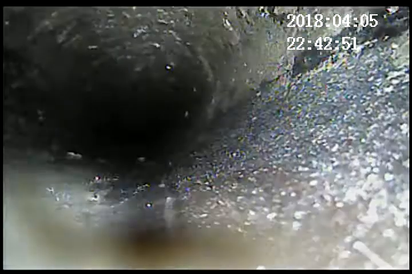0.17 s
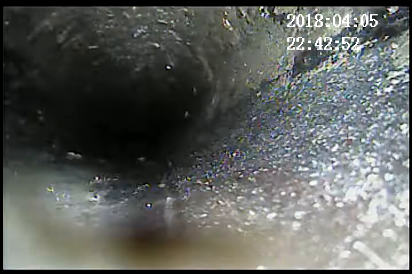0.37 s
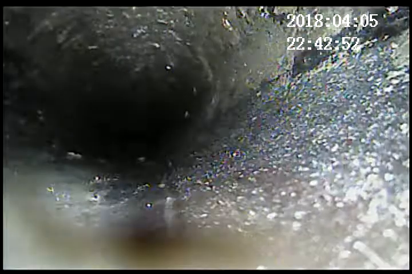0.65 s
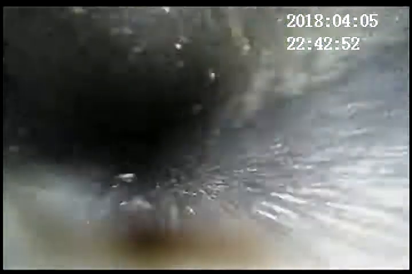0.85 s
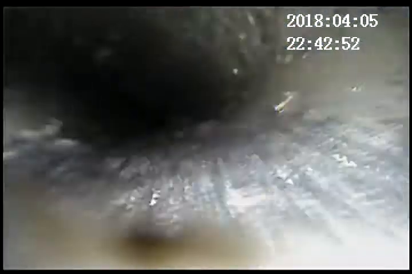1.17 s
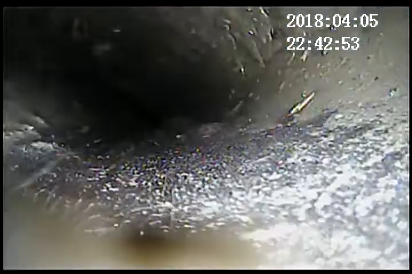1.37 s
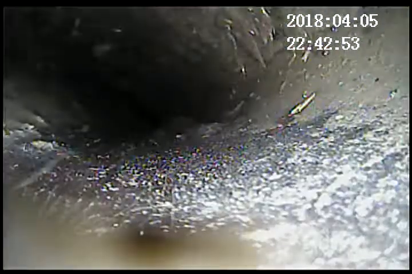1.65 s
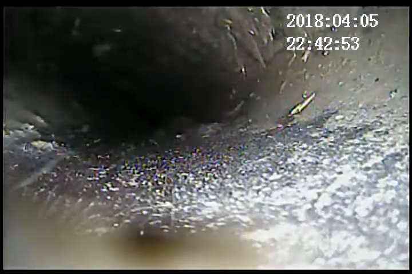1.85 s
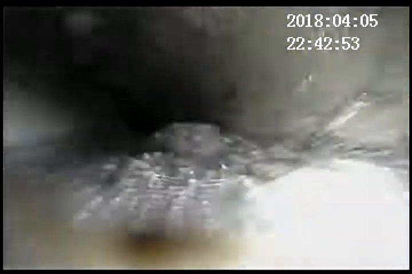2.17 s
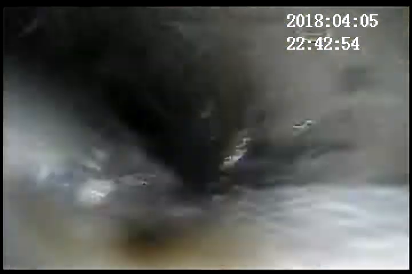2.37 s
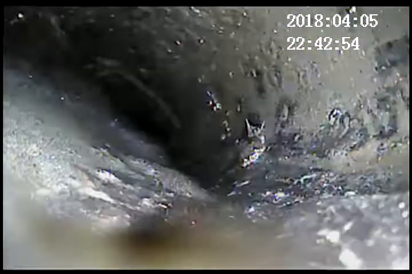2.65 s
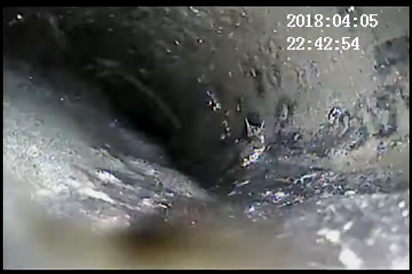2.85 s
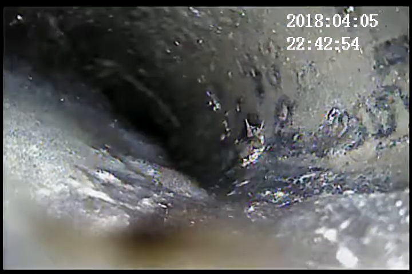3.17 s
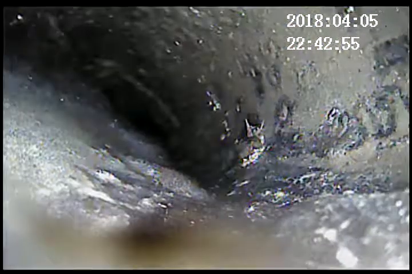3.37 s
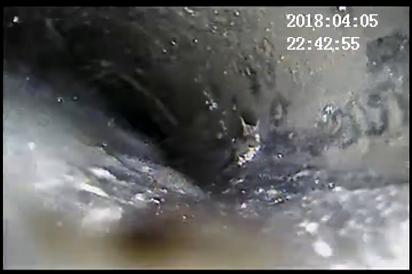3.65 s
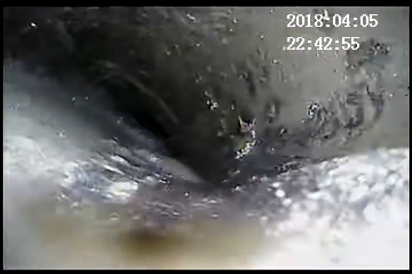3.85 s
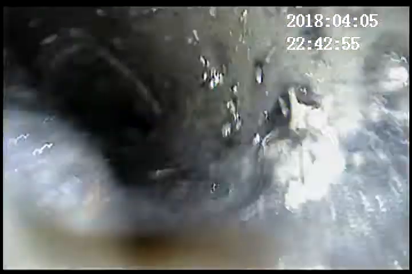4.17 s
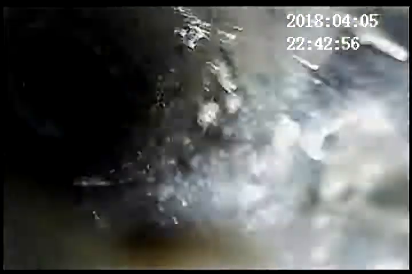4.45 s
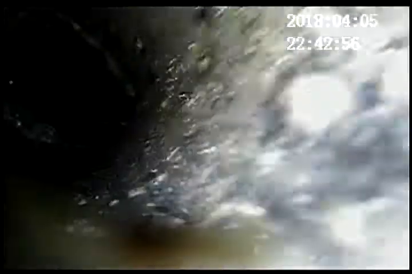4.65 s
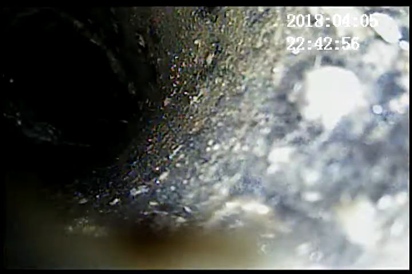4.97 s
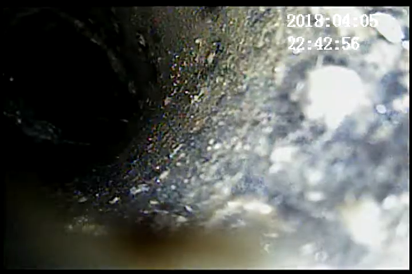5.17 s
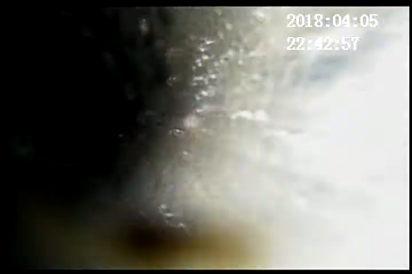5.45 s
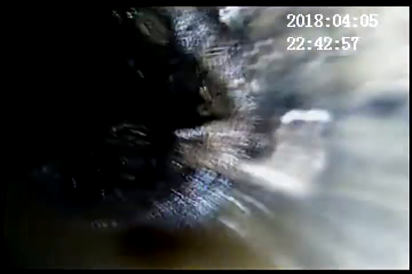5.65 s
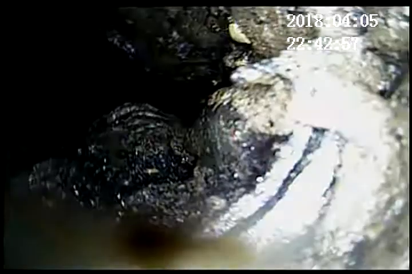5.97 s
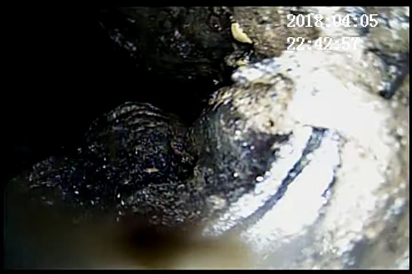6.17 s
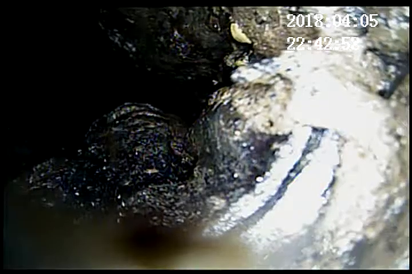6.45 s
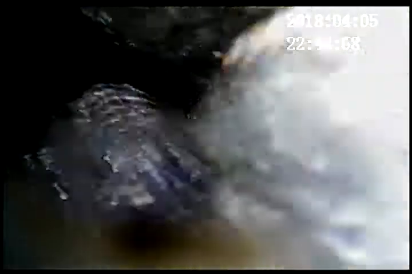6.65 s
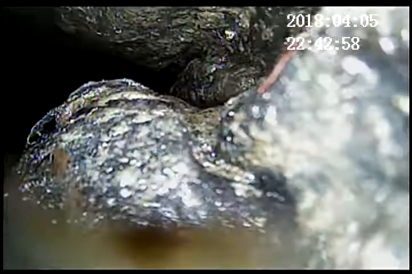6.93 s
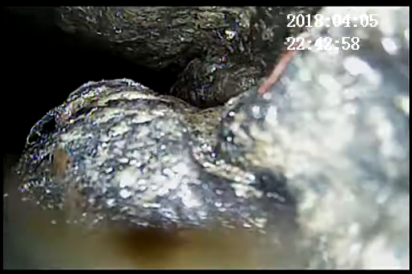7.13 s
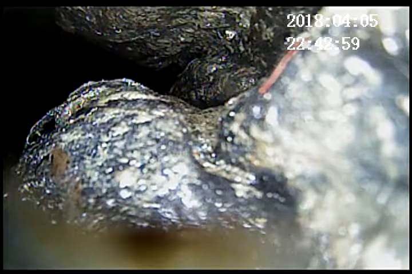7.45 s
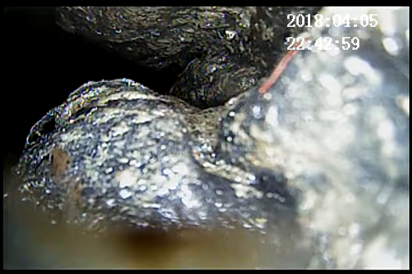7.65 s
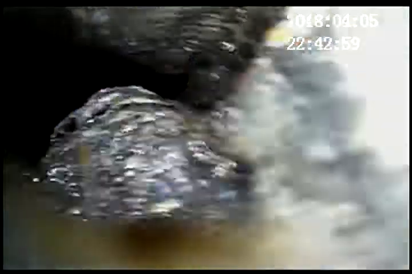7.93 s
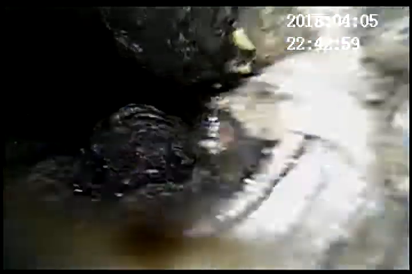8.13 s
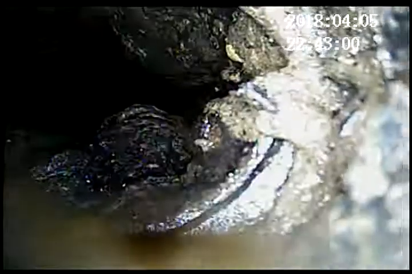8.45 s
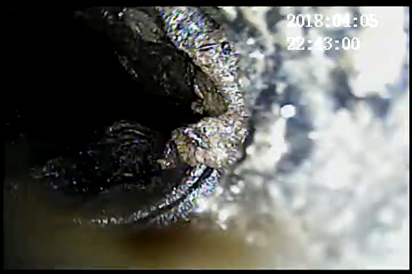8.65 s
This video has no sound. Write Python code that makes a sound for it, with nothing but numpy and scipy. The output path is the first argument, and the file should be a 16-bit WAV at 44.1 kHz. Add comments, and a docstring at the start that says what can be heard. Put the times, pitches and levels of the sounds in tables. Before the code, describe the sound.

A stiff cable is pushed in uneven bursts through a metal frame. Stick-slip creaks come first, then soft thuds and the loudest ringing knocks, overloading slightly. Afterwards come irregular clacks, brief rasping snags and faint steel pings, becoming sparse, with a soft double bump near the end. Close, dry single microphone, dull in the extreme top, with constant low hiss.

```python
"""Push cable at its reel

An inspection camera is worked along a damaged pipe on a stiff push cable, heard at the cable reel.
Sliding cable: fine slips drive the frame modes as hiss and scrape. Reel: stick-slip drives the low modes.
Cable knocks ring the frame, some with a steel chime; brief squeaks are single wavering tones.
Handling adds swung bumps and lumpy rumble over steady hiss; the hardest blows clip.
"""
import sys
import numpy as np
from scipy import signal
from scipy.fft import rfft, irfft, next_fast_len
from scipy.io import wavfile
from scipy.ndimage import uniform_filter1d

SR = 44100
rng = np.random.default_rng(int(sys.argv[2]) if len(sys.argv) > 2 else 0)


def dump(signal):
    """Clip the signal to [-1, 1] and save it as 16-bit WAV at the path in sys.argv[1]."""
    limited = np.clip(np.atleast_2d(signal).T, -1, 1)
    pcm = np.round(limited * 32767).astype(np.int16)
    wavfile.write(sys.argv[1], SR, pcm)


N = 387888
TIME = np.arange(N) / SR


def from_db(db):
    return 10 ** (np.asarray(db) / 20)


def clock(seconds):
    return np.arange(int(seconds * SR)) / SR


def rms_one(x):
    return x / np.sqrt(np.mean(x ** 2) + 1e-20)


def envelope(x, seconds):
    """Running rms."""
    return np.sqrt(np.abs(uniform_filter1d(x ** 2, max(int(seconds * SR), 1), mode="constant")) + 1e-16)


def peak_one(x):
    """Scale the highest 4 ms rms to 1."""
    return x / envelope(x, 0.004).max()


def add(out, s, sound):
    at = max(int(s * SR), 0)
    out[at:at + len(sound)] += sound[:N - at]


def band(x, low_hz, high_hz):
    sos = signal.butter(2, [low_hz, min(high_hz, SR / 2 - 100)], "band", fs=SR, output="sos")
    return signal.sosfilt(sos, x)


def steep_band(x, low_hz, high_hz):
    return band(band(x, low_hz, high_hz), low_hz, high_hz)


def band_noise(t, low_hz, high_hz, t60):
    """Dying noise in one band."""
    return band(rng.standard_normal(len(t)) * fade(t, t60), low_hz, high_hz)


def fade(t, t60):
    return np.exp(-np.log(1000) * t / t60)


def coloured(x, points):
    """Give x a smooth spectrum; rms 1."""
    hz, db = np.transpose(points)
    size = next_fast_len(N)
    bins = np.maximum(np.fft.rfftfreq(size, 1 / SR), 1)
    gain = from_db(np.interp(np.log(bins), np.log(hz), db))
    return rms_one(irfft(rfft(x, size) * gain, size)[:N])


def slips(per_s, spread_db):
    """Friction: tiny slips at random moments, of uneven size."""
    happens = rng.random(N) < per_s / SR
    sign = rng.choice([-1, 1], N)
    return happens * sign * from_db(spread_db * np.clip(rng.standard_normal(N), -2, 2))


def grip(spread_db, per_s=45):
    """Contact pressure wavers at random: a gain over time."""
    steps = rng.standard_normal(4000)
    return from_db(spread_db * np.interp(TIME * per_s, np.arange(len(steps)), steps))


def strokes(rows, rise_s, sag_db_per_s, release_db_per_s):
    """Gain of strokes (t/s, hold/s, level/dB): swells 20 dB per rise time, sags in the hold, dies away."""
    power = np.zeros(N)
    for (s, hold_s, db), rise in zip(rows, np.broadcast_to(rise_s, len(rows))):
        age = TIME - s
        swell_db = 20 * np.minimum(age, 0) / rise
        sag_db = sag_db_per_s * np.clip(age, 0, hold_s)
        release_db = release_db_per_s * np.maximum(age - hold_s, 0)
        shape_db = swell_db - sag_db - release_db
        heard = shape_db > -60
        power[heard] += from_db(db + shape_db[heard]) ** 2
    return np.sqrt(power)


# reel frame modes: f/Hz, t60/s, struck spectral height/dB, rubbed spectral height/dB (both relative)
FRAME_MODES = [(229.2, 0.18, -21, -4), (299.2, 0.15, -5, 7), (320.6, 0.082, -9, 1), (347, 0.17, -10, 5),
               (454, 0.12, -2.5, -7.5), (504.3, 0.12, -1.5, -9), (543.3, 0.063, -16, -10.5),
               (658.4, 0.075, 6, -9), (714, 0.16, 3, -13), (806, 0.14, 4.5, -13.5),
               (902, 0.064, 3.5, -10.5), (1091, 0.046, 0.5, -9.5), (1135, 0.044, -12, -32),
               (1422, 0.086, 1.5, -20), (1491, 0.022, -2.5, -23), (1991, 0.017, -8.5, -21.5),
               (2308, 0.044, 1.5, -8.5), (2495, 0.028, -0.5, -17.5), (2598, 0.098, -2, -8.5),
               (2857, 0.056, -7, -14), (3220, 0.018, -10.5, -38), (3413, 0.26, -4.5, -53),
               (3720, 0.022, -3, -33), (3814, 0.026, -4, -31), (3900, 0.045, -10, -48),
               (4160, 0.069, -4.5, -40), (4230, 0.031, -14, -36)]
# upper edges of body, clack and ping registers: f/Hz
REGISTER_EDGES_HZ = [600, 1700, 3400]


def registers():
    """Masks of the modes in the frame's body, clack, ping and top."""
    which = np.digitize(np.array(FRAME_MODES)[:, 0], REGISTER_EDGES_HZ)
    return [which == k for k in range(4)]


def rubbed(force, register):
    """Friction drives one register's modes as two-pole resonators; rms 1."""
    out = np.zeros(N)
    for k, (hz, t60, _, db) in enumerate(np.array(FRAME_MODES)[register]):
        r = from_db(-60 / (t60 * SR))
        poles = [1, -2 * r * np.cos(2 * np.pi * hz / SR), r * r]
        zeros = [(1 - r * r) / 2, 0, (r * r - 1) / 2]   # about unit gain at resonance
        out += (-1) ** k * from_db(db) * signal.lfilter(zeros, poles, force + 1e-18)
    return rms_one(out)


# snags and drags: t/s, relative rasp level/dB, relative scrape level/dB, decay/s
CABLE_DRAGS = [(0.248, -23.5, -44, 0.012), (0.321, -19, -46, 0.0023), (0.976, -35, -44, 0.015),
               (1.165, -33.5, -36.5, 0.033), (1.96, -24.5, -49, 0.0035), (2.06, -28, -47, 0.0072),
               (2.11, -38, -35, 0.013), (3.228, -13.5, -10, 0.015), (3.262, -18, -12.5, 0.011),
               (4.3, -33, -39, 0.035), (4.446, -56, -39, 0.018), (5.031, -26.5, -26, 0.0081),
               (5.343, -37, -33, 0.0042), (6.076, -39, -34, 0.012), (7.853, -26.5, -26.5, 0.0095),
               (7.876, -29.5, -32, 0.073), (7.942, -42, -32, 0.0091), (7.968, -28, -34, 0.0093)]


def drags(rise_s=0.001):
    """Each snag lets go quickly and dies away: gains of (rasp, scrape)."""
    t, out = clock(0.25), np.zeros((2, N))
    for s, rasp_db, scrape_db, decay_s in CABLE_DRAGS:
        shape = (1 - np.exp(-t / rise_s)) * np.exp(-t / decay_s)
        add(out[0], s, from_db(rasp_db) * shape)
        add(out[1], s, from_db(scrape_db) * shape)
    return out


# pushes through the guide: t at full speed/s, hold/s, relative hiss level/dB, relative scrape level/dB
CABLE_PUSHES = [(0.01, 0.16, -46, -40), (0.197, 0.32, -38, -40), (0.786, 0.11, -38, -36),
                (0.956, 0.29, -39.5, -37), (1.47, 0.25, -43.5, -53), (1.997, 0.46, -37, -33),
                (2.586, 0.31, -45, -56), (3.05, 0.057, -44.5, -31.5), (3.55, 0.12, -46.5, -34),
                (4.105, 0.16, -40.5, -35.5), (4.308, 0.19, -38.5, -34), (4.662, 0.25, -42, -33),
                (4.975, 0.064, -39, -30), (5.306, 0.36, -45.5, -38), (5.568, 0.25, -38.5, -36.5),
                (6.03, 0.32, -43, -36.5), (6.4, 0.14, -48, -41), (6.662, 0.21, -41.5, -35),
                (7.097, 0.069, -49, -36), (7.262, .19, -54.5, -45), (7.72, 0.23, -46, -40),
                (7.894, .3, -46.5, -37)]
PUSH_RISE_S, PUSH_RELEASE_DB_PER_S = 0.092, 170


def cable(hiss_db=-4.0, scrape_db=-11.0, drag_db=-1.5, broad_db=-9, grit_db=-22,
          guide_db=-12, hollow_db=-3, even_s=0.037):
    """Sliding cable feeds fine slips to the frame modes, with bursts where it snags."""
    _, clack, ping, top = registers()
    hz = np.array(FRAME_MODES)[:, 0]
    hollow = (hz > 400) & (hz < 600)
    s, hold_s, *levels_db = np.transpose(CABLE_PUSHES)
    sliding = np.array([strokes(np.c_[s, hold_s, db], PUSH_RISE_S, 0, PUSH_RELEASE_DB_PER_S)
                        for db in levels_db])
    sliding = sliding * from_db([[hiss_db], [scrape_db]]) * grip(spread_db=2.97)
    hiss, scrape = sliding + from_db(drag_db) * drags()   # snag rasp joins the hiss

    force = slips(per_s=3000, spread_db=9)
    bright = rubbed(force, ping | top)
    bright = bright + from_db(broad_db) * rms_one(band(force, 1870, 3300))
    bright = bright + from_db(grit_db) * rms_one(band(force, 2700, 11700))
    # the guide has a thin ring of its own
    guide_ring = rms_one(band(slips(per_s=3000, spread_db=5), 3570, 3750))
    bright = bright + from_db(guide_db) * guide_ring
    dull = rubbed(force, clack) + from_db(hollow_db) * rubbed(force, hollow)
    # level each texture before its gain shapes it
    return hiss * bright / envelope(bright, even_s) + scrape * dull / envelope(dull, 2 * even_s)


# reel turns: t at full force/s, hold/s, 20 dB rise/s, relative groan level/dB, relative rasp level/dB
REEL_TURNS = [(0.183, 0.018, 0.029, -22.5, -34), (0.212, 0.017, .014, -6.5, -27.5),
              (0.256, 0.0091, 0.021, -8.5, -20.5), (0.292, 0.0096, 0.015, -5.5, -22),
              (0.424, 0.1, 0.039, -17.5, -27), (0.805, 0.0095, 0.057, -17, -26),
              (0.834, 0.034, 0.033, -15, -39), (0.934, 0.033, .03, -29, -58),
              (1.69, 0.006, 0.011, -23, -37), (1.947, 0.12, .015, -17, -30.5),
              (2.216, 0.085, .012, -19, -43.5), (2.294, 0.082, 0.047, -14.5, -34.5),
              (2.423, 0.012, .018, -11, -32), (2.482, 0.015, 0.012, -4.5, -22),
              (5.028, 0.044, .02, -22.5, -32.5), (5.336, 0.02, 0.024, -32.5, -43)]
GROAN_SAG_DB_PER_S, RASP_SAG_DB_PER_S, TURN_RELEASE_DB_PER_S = 23, 67, 323


def reel(grit_db=-36, shake_db=-15, fill_db=-1, even_s=0.028):
    """Stick-slip at the hub drives the low modes, with a low shake and a little grit."""
    body, clack, _, _ = registers()
    s, hold_s, rise_s, groans_db, rasps_db = np.transpose(REEL_TURNS)
    groan = strokes(np.c_[s, hold_s, groans_db], rise_s, GROAN_SAG_DB_PER_S, TURN_RELEASE_DB_PER_S)
    rasp = strokes(np.c_[s, hold_s, rasps_db], rise_s, RASP_SAG_DB_PER_S, TURN_RELEASE_DB_PER_S)
    force = slips(per_s=1500, spread_db=1.0)
    low = rubbed(force, body)
    mid = rubbed(force, clack) + from_db(fill_db) * rms_one(steep_band(force, 410, 1020))
    grit = from_db(grit_db) * rms_one(band(force, 1200, 9600))
    shake = from_db(shake_db) * rms_one(band(force, 122, 393))
    return groan * (low / envelope(low, even_s) + grit + shake) + rasp * mid / envelope(mid, even_s)


def cushioned(x, smooth_s):
    """Soft contact as two equal one-pole lowpasses: rounder attack, favours the low modes."""
    r = np.exp(-1 / (smooth_s * SR + 1e-3))
    return signal.lfilter([(1 - r) ** 2], [1, -2 * r, r * r], x)


# cable strikes on the frame: t/s, ping level/dB, body level/dB, clack level/dB (all relative)
CABLE_KNOCKS = [(0.4293, -15.5, -11, -19), (2.4459, -24.5, -14.5, -21.5), (2.5277, -8, -16, -18),
                (2.6437, -25, -22, -30), (2.9276, -15.5, -14, -11.5), (2.9352, -7, -0.5, -15),
                (2.944, -6, -3, -9.5), (2.9516, -6, -13, -28), (2.969, -16.5, -13, -17.5),
                (3.0512, -12.5, -8.5, -15), (3.0643, -28, -19, -27), (3.2307, -17.5, -13.5, -17),
                (3.2466, -19, -11.5, -18), (3.264, -17, -10.5, -16), (3.2792, -16.5, -10.5, -19.5),
                (3.3409, -16.5, -20, -23), (3.5229, -14, -27, -29), (3.8323, -7, -17, -19),
                (4.0217, -25.5, -45, -36), (4.2211, -9.5, -21.5, -23), (4.3184, -14.5, -14, -15),
                (4.335, -29, -21, -20), (4.7012, -9.5, -23, -23.5), (4.9672, -15, -9, -18.5),
                (5.239, -27.5, -37, -33.5), (5.4816, -10.5, -20, -15), (6.135, -32, -35.5, -42),
                (6.1947, -21, -27.5, -27), (6.2551, -24, -19, -16.5), (6.2592, -19, -11, -23.5),
                (6.5086, -20, -28.5, -32), (6.7639, -19, -16.5, -17.5), (7.5077, -25.5, -30, -31)]
# top register relative to ping/dB; its further loss in dB per dB of body over ping
TOP_DB, TOP_LOSS = -9.5, 0.15
# after a soft blow the resting cable damps the frame: dB/s per dB of body over ping
RESTING_LOSS = 12.6


def knocks(trim_db=(0, -1, -6, -1.5), vary_db=2.5, smooth_s_per_db=0.34, chatter_s=0.003, chatter_db=-24,
           dense_db=(-8, -6, -3.5, -3), dense_t60=(.19, .08, .05, .045), crack_db=-20, crack_t60=0.077):
    """Each strike chatters up to 25 ms and rings the frame; hard ones ping, soft ones sound its body."""
    t = clock(0.3)
    hz, t60, struck_db, _ = np.transpose(FRAME_MODES)
    modes = np.cos(2 * np.pi * hz[:, None] * t) * fade(t, t60[:, None])
    edges_hz = [(220, 606), (620, 1370), (2050, 3310), (3400, 4310)]
    out = np.zeros(N)
    for s, ping, body, clack in CABLE_KNOCKS:
        softness_db = max(body - ping, 0)
        top = ping + TOP_DB - TOP_LOSS * softness_db
        # zero for hard blows; for soft ones so long that the lowpass nearly integrates twice
        smooth_s = smooth_s_per_db * softness_db
        chatter = rng.standard_normal(len(t)) * from_db(chatter_db)
        contact = (chatter * np.exp(-t / (chatter_s + 10 * smooth_s)))[:SR // 40]
        contact[0] = 1
        # spectral height grows with t60, hence the division
        strength = from_db(struck_db + vary_db * rng.standard_normal(len(hz))) / t60
        strength = strength * rng.choice([-1, 1], len(hz))
        resting = from_db(-RESTING_LOSS * softness_db * t)
        for k, (register, db) in enumerate(zip(registers(), (body, clack, ping, top))):
            low_hz, high_hz = edges_hz[k]
            ring = signal.fftconvolve(strength[register] @ modes[register], contact)[:len(t)]
            # many well-damped modes fill the gaps between the clear ones
            dense = band(band_noise(t, low_hz, high_hz, dense_t60[k]), low_hz, high_hz)
            sound = peak_one(ring) + from_db(dense_db[k]) * peak_one(dense)
            sound = band(cushioned(sound * resting, smooth_s), low_hz * 0.84, high_hz * 1.46)
            add(out, s, from_db(db + trim_db[k]) * peak_one(sound))
        crack = peak_one(band_noise(t, 5500, 10600, crack_t60))
        add(out, s, from_db(top + crack_db) * crack)
    return out


# blows that ring a steel part of the reel: t/s, level/dB
STEEL_CHIMES = [(2.951, -24), (3.835, -26.5), (4.22, -46), (4.7, -36), (6.134, -37), (6.436, -43)]
CHIME_HZ, CHIME_T60_S = 2596, 0.33


def chimes():
    """One lightly damped steel mode: a decaying sine per blow."""
    t, out = clock(0.5), np.zeros(N)
    for s, db in STEEL_CHIMES:
        add(out, s, from_db(db) * np.sin(2 * np.pi * CHIME_HZ * t) * fade(t, CHIME_T60_S))
    return out


# brief cable squeaks: t/s, level/dB, mean f/Hz
CABLE_SQUEAKS = [(3.639, -30, 2360), (4.66, -22.5, 2860)]


def squeaks(swell_s=0.0039, waver=0.04):
    """The cable catches and sings for a moment on one unsteady pitch."""
    t, out = clock(0.044), np.zeros(N)
    for s, db, hz in CABLE_SQUEAKS:
        pitch_hz = hz * (1 + waver * rms_one(band(rng.standard_normal(len(t)), 50, 500)))
        swell = t / swell_s * np.exp(1 - t / swell_s)
        add(out, s, from_db(db) * swell * np.sin(2 * np.pi * np.cumsum(pitch_hz) / SR))
    return out


# dull handling bumps: t/s, relative level/dB, f/Hz
HANDLING_BUMPS = [(0.125, -21.5, 155), (1.37, -30, 91), (1.526, -16, 144), (1.632, -22.5, 117),
                  (1.824, -23, 120), (1.843, -23.5, 129), (2.55, -9, 336), (2.579, -10.5, 212),
                  (2.602, -9.5, 155), (2.644, -9.5, 294), (2.703, -15.5, 190), (2.733, -12, 149),
                  (2.762, -10.5, 211), (2.792, -5, 276), (2.802, -7.5, 162), (2.863, -15.5, 173),
                  (3.609, -18, 219), (3.712, -13, 196), (3.77, -17.5, 174), (3.798, -18, 78.5),
                  (3.81, -9, 240), (3.979, -16.5, 182), (4.119, -18, 126), (4.135, -19, 125),
                  (4.597, -18, 133), (4.621, -17.5, 298), (4.637, -15, 308), (4.755, -24, 136),
                  (5.866, -29.5, 264), (7.136, -28, 111), (8.21, -10.5, 174), (8.236, -11.5, 265),
                  (8.265, -21, 169), (8.433, -23.5, 252), (8.645, -22, 141), (8.715, -22.5, 92)]


def bumps(level_db=3.5, swell_cycles=0.56, tail_db=-19, tail_s=0.018):
    """A soft push swings the housing for a couple of cycles, with a low shudder."""
    t, out = clock(0.15), np.zeros(N)
    for s, db, hz in HANDLING_BUMPS:
        age = hz * t / swell_cycles
        swing = age ** 2 * np.exp(2 - 2 * age) * np.sin(2 * np.pi * hz * t + rng.uniform(0, 2 * np.pi))
        shudder = rms_one(band(rng.standard_normal(len(t)), 94, 306)) * np.exp(-t / tail_s)
        add(out, s, from_db(db + level_db) * (swing + from_db(tail_db) * shudder))
    return out


# how hard the hands work the cable, as rumble level before the grip wavers: t/s, level/dB
HAND_EFFORT = [(0.0, -43), (0.37, -38.5), (0.54, -40.5), (1.59, -42.5), (1.94, -39.5), (2.05, -36.5),
               (2.3, -34), (2.62, -28), (3.53, -35), (3.85, -32.5), (4.26, -35.5), (4.58, -32), (5.14, -42),
               (5.58, -46), (7.05, -42), (7.28, -47.5), (7.96, -45), (8.8, -41)]
# rumble spectrum: f/Hz, relative level per Hz/dB
RUMBLE_SPECTRUM = [(15, -46), (30, -9), (60, -0.5), (130, 0), (200, -7), (300, -12.5), (600, -49)]


def handling(frame_db=-5, broad_db=1.0, frame_follows=0.78):
    """Lumpy rumble from the hands also stirs the frame's body; both grow with the effort."""
    effort_db = np.interp(TIME, *np.transpose(HAND_EFFORT))
    stir_db = effort_db.mean() + frame_follows * (effort_db - effort_db.mean())
    force = slips(per_s=370, spread_db=4.5)
    stirred = rubbed(force, registers()[0]) + from_db(broad_db) * rms_one(band(force, 115, 394))
    rumble = from_db(effort_db) * grip(spread_db=3.5, per_s=23) * coloured(force, RUMBLE_SPECTRUM)
    return rumble + from_db(stir_db + frame_db) * rms_one(stirred)


# hiss spectrum: f/Hz, relative level per Hz/dB
HISS_SPECTRUM = [(30, 12), (300, -5), (900, 3), (1600, -3.5), (4000, -10), (6000, -15.5), (10000, -16.5),
                 (12000, -41)]


def steady_hiss(rms_db=-46):
    """Stationary Gaussian noise with a smooth spectrum."""
    return from_db(rms_db) * coloured(rng.standard_normal(N), HISS_SPECTRUM)


def scene():
    """Sum of all sources, one channel."""
    hiss = steady_hiss()
    strikes = knocks() + chimes() + bumps()
    friction = squeaks() + reel() + cable()
    return (strikes + friction + handling() + hiss)[None]


def record(dry, clip_level=0.71, cutoff_hz=11000):
    """The input clips flat on the hardest blows, and the top is cut."""
    clipped = np.clip(dry, -clip_level, clip_level)
    return signal.sosfilt(signal.butter(16, cutoff_hz, fs=SR, output="sos"), clipped)


dry = scene()
out = record(dry)
dump(out)
```